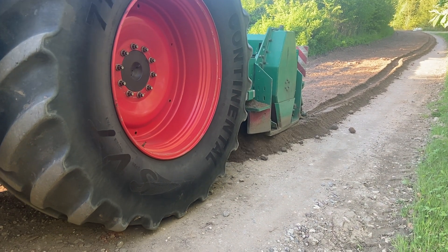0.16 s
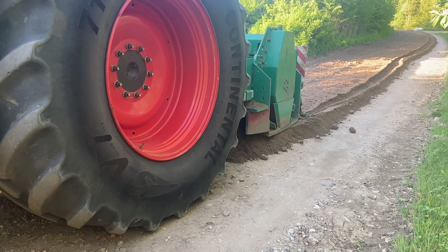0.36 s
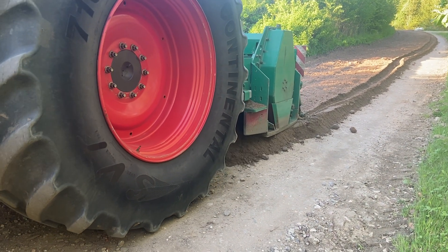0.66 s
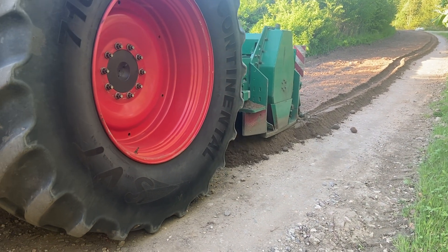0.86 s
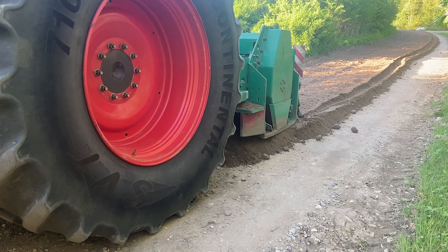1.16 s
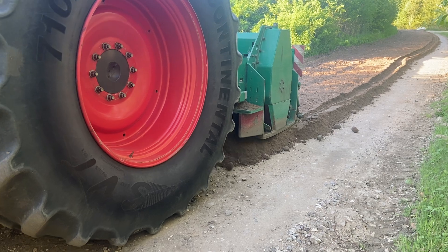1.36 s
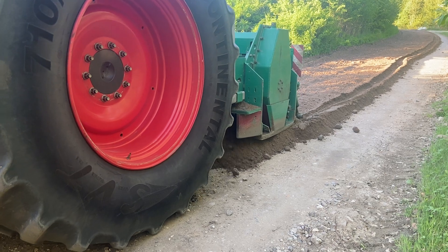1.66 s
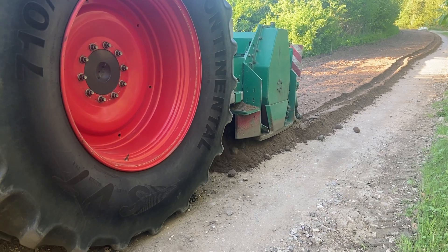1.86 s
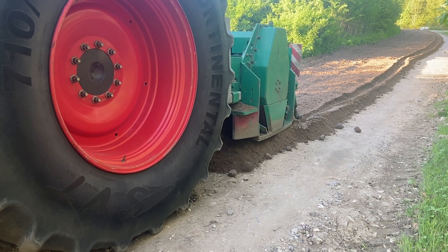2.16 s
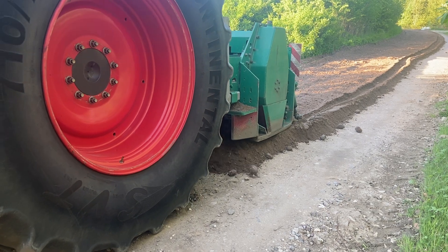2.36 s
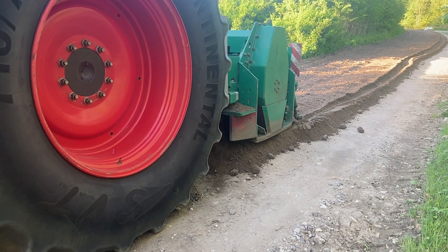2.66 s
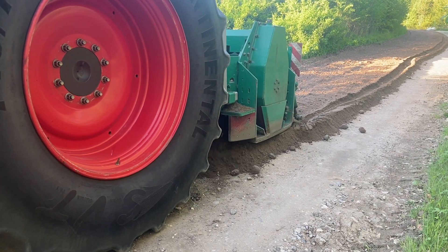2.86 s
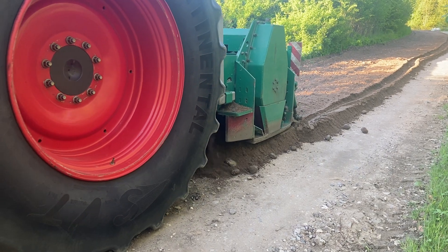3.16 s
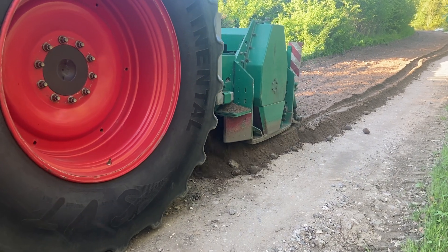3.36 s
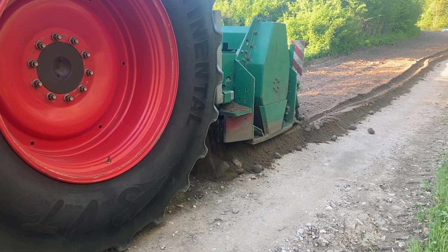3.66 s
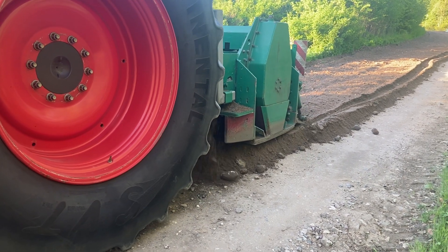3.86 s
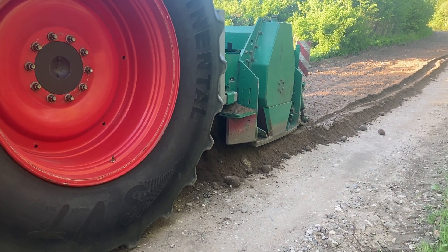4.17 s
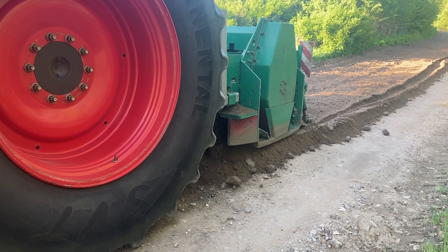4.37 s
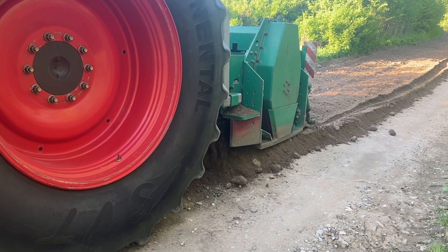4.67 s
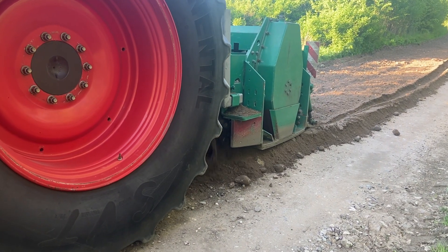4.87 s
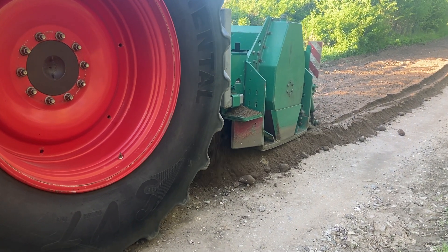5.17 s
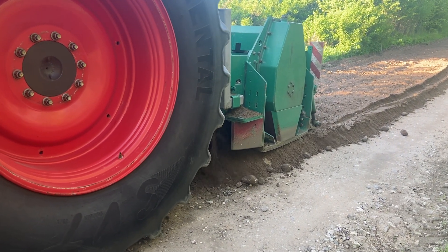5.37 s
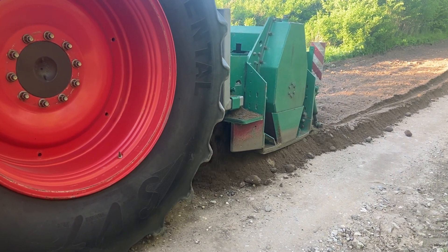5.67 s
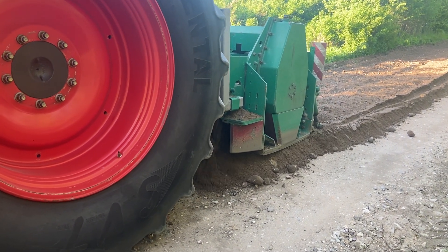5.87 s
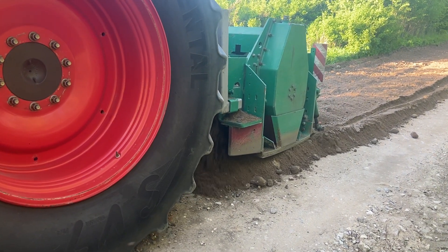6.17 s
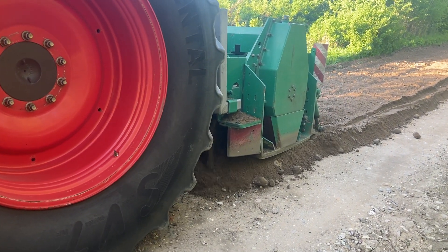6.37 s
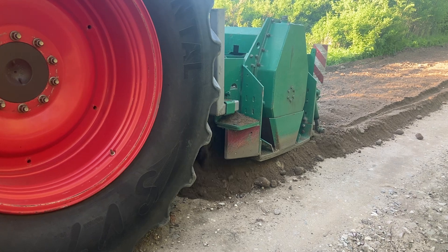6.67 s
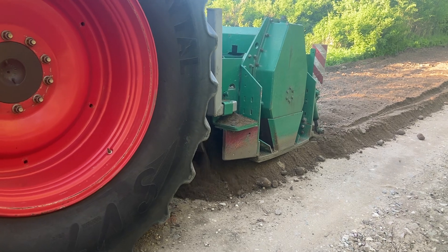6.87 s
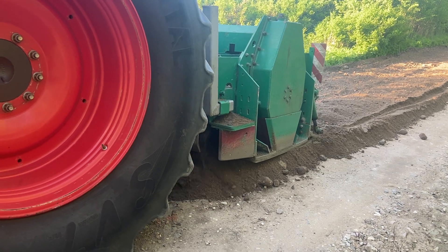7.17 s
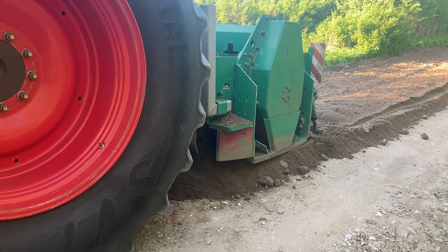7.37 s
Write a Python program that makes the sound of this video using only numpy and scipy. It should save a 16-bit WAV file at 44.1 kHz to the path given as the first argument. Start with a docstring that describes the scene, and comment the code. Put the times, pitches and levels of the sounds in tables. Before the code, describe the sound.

A tractor's diesel engine drones under load while its stone crusher steadily grinds gravel, with occasional sharp knocks of stones on steel.

```python
"""A tractor crushing stones

A tractor creeps along a track, driving a rotor stone crusher through coarse gravel.
The diesel drones and clatters, gears sing and the turbocharger whistles. Thousands of tiny
hits make the steady grinding, and now and then a larger stone bangs about in the steel housing."""
import sys
import numpy as np
from scipy import signal
from scipy.fft import irfft
from scipy.io import wavfile
from scipy.ndimage import uniform_filter1d

SR = 44100
rng = np.random.default_rng(int(sys.argv[2]) if len(sys.argv) > 2 else 0)


def store_wav(level_fs):
    """Save 16-bit WAV to argv[1]."""
    pcm = np.round(np.clip(np.atleast_2d(level_fs), -1, 1) * 32767)
    wavfile.write(sys.argv[1], SR, pcm.T.astype(np.int16))


N = 331191
TIME = np.arange(N) / SR
CUTOFF_HZ = 15700


def from_db(db):
    """Turn decibels into a number to multiply a sound by."""
    return 10 ** (np.asarray(db) / 20)


def rms_one(x):
    """Scale a sound so that its average strength (rms) is 1."""
    return x / np.sqrt(np.mean(x ** 2) + 1e-20)


def evened(x, size=500):
    """Hold a short noise at a steady strength of 1 while keeping its grain."""
    return x / np.sqrt(uniform_filter1d(np.mean(x ** 2, axis=0), size) + 1e-12)


def in_time(rows):
    """Join a table's timed rows with straight lines: one curve for each column after the time."""
    seconds, *columns = np.transpose(rows)
    return [np.interp(TIME, seconds, column) for column in columns]


def at_hz(rows, hz):
    """Look up a table's value at any pitch, sliding between its rows."""
    pitches, values = np.transpose(rows)
    return np.interp(np.log(hz), np.log(pitches), values)


def passing(first_db, last_db):
    """The machine creeps by at an even pace, so a level moves evenly from first to last."""
    return first_db + (last_db - first_db) * TIME / TIME[-1]


def bell(centre_s, half_width_s):
    """A smooth hump in time, of height 1."""
    return np.exp(-((TIME - centre_s) / half_width_s) ** 2)


def burst(start_s, fade_s, rise_s):
    """The loudness of one hit: a quick rise, and a fall of 60 dB in fade_s."""
    out, first = np.zeros(N), int(start_s * SR)
    age = np.arange(min(N - first, int(2 * fade_s * SR))) / SR
    out[first:first + len(age)] = (1 - np.exp(-age / rise_s)) * from_db(-60 * age / fade_s)
    return out


def drift(hz, step=64, warm_up=3000):
    """A smooth random wander of typical size 1; more hz makes it quicker."""
    r = np.exp(-2 * np.pi * hz * step / SR)
    noise = rng.standard_normal(N // step + warm_up + 2)
    slow = signal.lfilter([1], [1, -2 * r, r * r], noise)[warm_up:]
    return np.interp(np.arange(N) / step, np.arange(len(slow)), rms_one(slow))


def swaying(hz):
    """A random wander that stays between -1.5 and 1.5."""
    return 1.5 * np.tanh(drift(hz))


def panned(pan_db):
    """Left and right gains; a pan is how many dB louder the left ear is."""
    return from_db(np.array([[.5], [-.5]]) * pan_db)


def stereo(pair, alike):
    """Mix two unrelated sounds into left and right: alike is 0 for unrelated ears, 1 for the same."""
    shared = np.sqrt((1 + alike) / 2) * pair[0]
    opposite = np.sqrt((1 - alike) / 2) * pair[1]
    return np.array([shared + opposite, shared - opposite])


def from_left(x, lag_s=.00043):
    """Sound from the tractor's side reaches the right ear later."""
    return np.array([x[0], np.interp(TIME - lag_s, TIME, x[1])])


def from_right(x, lag_s=.00027):
    """Sound from the crusher's side reaches the left ear later."""
    delayed = np.maximum(np.arange(N) - round(lag_s * SR), 0)
    return np.array([x[0, delayed], x[1]])


def resonate(x, hz, *widths_hz):
    """Make a sound ring at one pitch, once for each width; narrower rings longer."""
    for width in widths_hz:
        r = np.exp(-np.pi * width / SR)
        feedback = [1, -2 * r * np.cos(2 * np.pi * hz / SR), r * r]
        x = signal.lfilter(np.array([1, 0, -1]) * (1 - r * r) / 2, feedback, x + 1e-18)
    return x


def impacts(per_s, spread_db):
    """Two streams of tiny random hits of uneven size."""
    hit = rng.random((2, N)) < per_s / SR
    sizes = from_db(spread_db * np.minimum(rng.exponential(1, (2, N)), 4))
    return rms_one(hit * sizes * rng.choice([-1, 1], (2, N)))


def tone(cycles, flutter, flutter_hz, alike):
    """One machine note; uneven load shakes its strength and timing, differently at each ear."""
    strength, timing = [flutter * stereo([drift(flutter_hz), drift(flutter_hz)], alike) for _ in range(2)]
    angle = 2 * np.pi * (cycles + rng.random())
    return ((1 + strength) * np.cos(angle) + timing * np.sin(angle)) / np.sqrt(.5 + flutter ** 2)


# How similar the noise is at the two ears. Each row: pitch in Hz, likeness from 0 to 1.
EAR_LIKENESS = [(60, 0.91), (130, 1), (290, 0.86), (500, 1), (700, 0.67), (1300, 0.82), (2300, 1),
                (4000, 0.64), (6000, 0.074), (9000, 0.03), (15000, 0)]
# Which way the noise leans. Each row: pitch in Hz, pan in dB.
EAR_BALANCE = [(60, -0.5), (110, 0.5), (200, 1), (380, -0.5), (700, 6.5), (1290, -2.5), (2380, -3),
               (4400, 2), (8120, -1), (15000, 1)]
def hail(colour, per_s, spread_db, flicker_db, surge_db, alike=None):
    """Tiny hits blur into a noise of strength 1, whose pitch bands surge together and flicker alone."""
    streams = impacts(per_s, spread_db), impacts(per_s, spread_db)
    edges = np.append(20 * 2 ** (np.arange(30) / 3), CUTOFF_HZ * 1.1)   # three bands to an octave
    out = np.zeros((2, N))
    for k, (low, high) in enumerate(zip(edges, edges[1:])):
        hz = np.sqrt(low * high)
        if colour[0][0] < hz < colour[-1][0]:
            band_filter = signal.butter(2, [low, high], "band", fs=SR, output="sos")
            band = signal.sosfilt(band_filter, streams[k % 2])
            gain = from_db(at_hz(colour, hz) + flicker_db * swaying(7.6))
            likeness = at_hz(EAR_LIKENESS, hz) if alike is None else alike
            out += gain * stereo(band, likeness) * panned(at_hz(EAR_BALANCE, hz))
    return rms_one(out * from_db(surge_db))


# The ring of the skid the crusher slides on. Each row: time in seconds, level in dB.
SKID_LEVELS = [(0, -60), (1.2, -47), (2.3, -47), (2.6, -40), (3.3, -41.5), (3.9, -54), (4.25, -41),
               (4.5, -53), (5.6, -49), (7.51, -52)]
def skid(hz=3940, width_hz=190):
    """Grit dragged under the steel skid keeps it faintly ringing."""
    level_db, = in_time(SKID_LEVELS)
    scraping = stereo(impacts(per_s=350, spread_db=2), alike=.33)
    return from_db(level_db) * rms_one(resonate(scraping, hz, width_hz, 4 * width_hz))


# Engine speed, sagging where the ground is packed. Each row: time in seconds, turns per second.
ENGINE_SPEED = [(0, 26.84), (.35, 26.96), (.95, 26.95), (1.15, 26.83), (1.75, 26.85), (2.1, 26.96),
                (3.2, 26.92), (4.05, 26.98), (4.35, 26.72), (4.9, 26.7), (5.6, 26.85), (5.9, 27.02),
                (6.2, 27.0), (6.55, 26.9), (7.51, 26.88)]
def engine_turns():
    """Count the engine's turns so far; everything geared to it follows this count."""
    return np.cumsum(in_time(ENGINE_SPEED)[0]) / SR


# The strongest high whine, like a pump's. Each row: time in seconds, level in dB.
PUMP_LEVELS = [(0, -54), (.25, -48), (.9, -49), (1.03, -44), (1.2, -48), (2.2, -49), (2.45, -42),
               (2.62, -52), (3.09, -44), (3.5, -54), (4.15, -47), (4.5, -58), (5.4, -52), (5.56, -42),
               (5.64, -53), (5.8, -39), (6.0, -54), (6.15, -43), (6.5, -54), (7.51, -48)]
# Fast gears. Each row: vibrations per engine turn, level in dB, pan in dB.
FAST_GEARS = [(146, -55, 0), (261.3, -56, 0)]
def high_whines(turns, pump_per_turn=270.6):
    """Fast parts geared to the engine sing thin notes that fade in and out."""
    pump_db, = in_time(PUMP_LEVELS)
    out = from_db(pump_db) * tone(pump_per_turn * turns, flutter=.7, flutter_hz=20, alike=.1)
    for per_turn, level_db, pan_db in FAST_GEARS:
        gain = from_db(level_db + 2 * swaying(3)) * panned(pan_db)
        out += gain * tone(per_turn * turns, flutter=1.3, flutter_hz=20, alike=.1)
    return out


# The turbo's whistle. Each row: time in seconds, pitch in Hz, level in dB.
TURBO_WHISTLE = [(0, 8060, -50), (.22, 8090, -48), (.6, 8000, -48), (.81, 8000, -50), (1.13, 7970, -44),
                 (1.55, 8000, -56), (1.63, 8016, -43), (1.85, 8130, -47), (2.17, 7860, -50),
                 (2.48, 7960, -42), (2.58, 7950, -44), (2.67, 7970, -40), (2.82, 7840, -45),
                 (2.88, 7880, -40), (2.98, 7860, -43), (3.05, 7840, -40), (3.14, 7830, -54),
                 (3.29, 7845, -37), (3.45, 7810, -52), (3.52, 7766, -39), (3.64, 7750, -40),
                 (3.74, 7800, -52), (4.2, 7700, -50), (4.5, 7690, -48), (4.98, 7900, -54),
                 (5.11, 7885, -37), (5.17, 7940, -39), (5.23, 7915, -41), (5.37, 7920, -35),
                 (5.46, 7965, -41), (5.7, 7950, -47), (5.97, 8000, -55), (6.1, 7915, -39),
                 (6.34, 7860, -51), (6.41, 7840, -43), (6.53, 7870, -57), (7.51, 7820, -52)]
def turbocharger():
    """The fan that pushes air into the engine chirps as its pressure rises and falls."""
    hz, level_db = in_time(TURBO_WHISTLE)
    gain = from_db(level_db + 1.5 * swaying(18))
    cycles = np.cumsum(hz + 6 * drift(12)) / SR
    return gain * tone(cycles, flutter=.45, flutter_hz=12, alike=.2)


def firing(turns):
    """A wave that peaks each time the engine fires, three times a turn."""
    return np.cos(2 * np.pi * 3 * turns)


# The tone colour of the engine's rattle. Each row: pitch in Hz, relative level in dB.
BUZZ_COLOUR = [(300, -20), (420, -4), (650, 2.5), (1050, -0.5), (1400, -12), (1800, -13), (2400, -4),
               (3000, -18), (4500, -12)]
def engine_buzz(turns, size=4096):
    """Injectors, valves and gears repeat a rattle every two turns; it slowly changes as they move by."""
    cycle_hz = ENGINE_SPEED[0][1] / 2
    hz = np.maximum(np.arange(size // 2 + 1), 1) * cycle_hz
    shape = from_db(at_hz(BUZZ_COLOUR, hz)) * (hz > BUZZ_COLOUR[0][0]) * (hz < BUZZ_COLOUR[-1][0])
    loops = irfft(shape * np.exp(2j * np.pi * rng.random((4, len(hz)))))   # four random rattles
    played = np.array([np.interp(turns / 2 % 1 * size, np.arange(size), loop) for loop in loops])
    blend = .55 * drift(.42)
    rattle = stereo(np.cos(blend) * played[:2] + np.sin(blend) * played[2:], alike=.53)
    return from_db(passing(-29.5, -35.5)) * from_left(rms_one(rattle * from_db(firing(turns))))


# The tone colour of the diesel's knock. Each row: pitch in Hz, relative level in dB.
CLATTER_COLOUR = [(450, -52), (650, 8), (800, 1.5), (1050, -1.5), (1450, 4), (1900, 2.5), (2400, -12.5),
                  (3200, 1), (4500, -31), (6000, -42), (8000, -43)]
def diesel_clatter(turns):
    """Burning fuel and valves knock, swelling with each firing and fading as the tractor passes."""
    knock = hail(CLATTER_COLOUR, per_s=9000, spread_db=4.5, flicker_db=-.5, surge_db=.26 * firing(turns))
    return from_db(passing(-25.5, -36.5)) * from_left(knock)


# Quiet notes of the engine, then of its shafts, belts and pumps.
# Each row: vibrations per engine turn, first level in dB, last level in dB, pan in dB.
ENGINE_NOTES = [(4, -36, -36, 1), (4.5, -30, -37, 2), (7.5, -35, -43, 3), (8.5, -31.5, -43, 3),
                (11, -37, -40, 3), (12, -40, -42, 0), (13, -45, -41, 0), (15, -38, -36, 0),
                (26, -43, -50, 0), (27, -43, -50, 2), (29, -47, -42.5, 3), (30, -35.5, -39.5, 5),
                (31.5, -42, -37, 5), (34.5, -40, -39.5, 6), (40, -40, -38.5, 0), (45, -39.5, -50, 0),
                (50, -44, -52, -4), (52.5, -48, -45, -2)]
SHAFT_NOTES = [(9.75, -37, -45, 1), (10.31, -31.5, -39, 2), (15.62, -37, -30.5, 0), (15.85, -46, -35, 0),
               (19.32, -39, -31, 4), (24.25, -41.5, -50, 8), (27.47, -42.5, -50, 3), (30.7, -47, -42.5, 3),
               (35.9, -50, -40, -1), (38.58, -34, -42, 5), (56.7, -50, -49, -4), (57.9, -43.5, -48, -4),
               (59.1, -48, -45, -3), (96.5, -57, -53, -2), (106.25, -53, -52, 3)]
def quiet_hums(turns):
    """The engine and the parts it spins each hum at their own multiple of its speed."""
    out = np.zeros((2, N))
    for per_turn, first_db, last_db, pan_db in ENGINE_NOTES + SHAFT_NOTES:
        gain = from_db(passing(first_db, last_db)) * panned(pan_db)
        out += gain * tone(per_turn * turns, flutter=.26, flutter_hz=3.8, alike=.58)
    return from_left(out)


# Four loud notes (firing, rotor, drive hum and its octave), then two notes of meeting gear teeth.
# Each row: vibrations per engine turn, pan in dB, flutter as a share of the note, flutter speed in Hz.
DRONE_NOTES = [(3, -.6, .22, 6), (5.18, -.6, .15, 4), (10.5, -.7, .22, 7), (21, 0, .24, 5)]
GEAR_NOTES = [(42, -2, .35, 12), (63, -3, .2, 8)]
# How the first five of those notes swell or dip as the machine creeps by. Each row: first level in dB,
# last level in dB, swell in dB (a dip if negative), its middle in seconds, its half-width in seconds.
NOTE_SWELLS = [(-29.5, -26.5, 3, 5.75, 0.55), (-37, -29, 4, 5.9, 1.6), (-30.5, -24, -11, 4.25, 1.02),
               (-38.5, -22, -4.5, 6.5, 1.1), (-31.5, -56.5, 19.5, 5.14, 1.3)]
# The higher gear note. Each row: time in seconds, level in dB, a number that is not played.
HIGH_GEAR_LEVELS = [(0, -33.5, -30), (.4, -34, -31), (.85, -32, -29), (1.1, -33, -29.5), (1.3, -35, -32),
                    (1.55, -38.5, -38), (2.0, -38, -34), (2.5, -34, -33.5), (2.8, -46, -36),
                    (2.93, -43, -31), (3.15, -39, -31), (3.4, -36, -37), (4.0, -34.5, -39),
                    (4.3, -32.5, -30), (4.85, -27.5, -33), (5.35, -30, -31.5), (5.95, -34.5, -37),
                    (6.399, -33, -31.5), (6.75, -31, -36), (7.51, -29.5, -37)]
def drone(turns, throb_db=3.8):
    """Engine, rotor and gears drone together; the higher gear note throbs with the load on the teeth."""
    levels = [passing(first_db, last_db) + swell_db * bell(centre_s, half_s)
              for first_db, last_db, swell_db, centre_s, half_s in NOTE_SWELLS]
    levels.append(in_time(HIGH_GEAR_LEVELS)[0] + throb_db * swaying(13))
    out = np.zeros((2, N))
    for (per_turn, pan_db, flutter, flutter_hz), level_db in zip(DRONE_NOTES + GEAR_NOTES, levels):
        out += from_db(level_db) * panned(pan_db) * tone(per_turn * turns, flutter, flutter_hz, alike=.85)
    return out


# Tone colours of the ground and the crusher's hood. Each row: pitch in Hz, relative level in dB.
RUMBLE_COLOUR = [(20, -26), (30, -17), (42, -7), (54, 9.5), (75, -4), (100, 15), (140, -38)]
BOOM_COLOUR = [(65, -28), (90, 0), (115, 0.5), (145, -1), (180, 2.5), (230, -2), (285, 0), (360, -15.5),
               (500, -49)]
# Jolts of the hood. Each row: start in seconds, rumble in dB, boom in dB, fade time in seconds.
HOOD_HEAVES = [(0.019, -24, -33, .55), (1.69, -44, -17, .67), (4.14, -23, -17, .3), (4.24, -20, -16.5, .35),
               (4.33, -25, -18, .4), (4.43, -25, -23, .3), (4.54, -24, -21, .45), (5.57, -20.5, -17.5, .36)]
def rumble_and_boom(lumps_db):
    """The ground rumbles and the hood booms, both louder when the hood heaves over a hard lump."""
    packed_soil_db = 5.5 * bell(centre_s=3.9, half_width_s=2.7)
    rumble_gain, boom_gain = from_db(-34 + packed_soil_db), from_db(-26)
    for start_s, rumble_db, boom_db, fade_s in HOOD_HEAVES:
        heave = burst(start_s, fade_s, rise_s=.0034)
        rumble_gain = np.hypot(rumble_gain, from_db(rumble_db) * heave)   # noises add by their power
        boom_gain = np.hypot(boom_gain, from_db(boom_db) * heave)
    rumble = hail(RUMBLE_COLOUR, per_s=3500, spread_db=-.5, flicker_db=1.5, surge_db=lumps_db)
    boom = hail(BOOM_COLOUR, per_s=6000, spread_db=1, flicker_db=.5, surge_db=lumps_db / 2)
    return rumble_gain * rumble + boom_gain * boom


# Tone colours of grit and sand. Each row: pitch in Hz, relative level in dB.
GRIT_COLOUR = [(2500, -51), (4000, -2), (4600, 4), (5750, 3), (7250, -7), (8100, -20)]
SAND_COLOUR = [(5000, -9), (5750, -3), (7250, 0.5), (9100, 0.5), (11500, -3.5), (14500, -7), (17000, -8)]
def grit_and_sand(flow_db, lumps_db):
    """Fine grit hisses and sand sprays against the skids, barely following the flow of gravel."""
    grit = hail(GRIT_COLOUR, per_s=22000, spread_db=5.5, flicker_db=.4,
                surge_db=lumps_db / 2 + .35 * drift(30))
    sand = hail(SAND_COLOUR, per_s=20000, spread_db=3.5, flicker_db=1.5,
                surge_db=lumps_db / 2 + .34 * drift(30), alike=1)
    grit *= from_db(passing(-39, -40) + .17 * flow_db)
    sand *= from_db(passing(-36, -39) + .17 * flow_db)
    return grit + from_right(sand)


# Low notes of the hood. Each row: pitch in Hz, width in Hz, relative level in dB.
PANEL_NOTES = [(237, 49, -17.5), (432.3, 27, -10), (511.6, 49.5, -3)]
def hood_panels(flow_db, lumps_db):
    """Gravel pelts the big panels, whose ring is dulled by the soil against them."""
    hits = stereo(impacts(per_s=1200, spread_db=2.5), alike=.93)
    ringing = sum((-1) ** k * from_db(db) * rms_one(resonate(hits, hz, width, 3 * width))
                  for k, (hz, width, db) in enumerate(PANEL_NOTES))
    return from_db(passing(-25.5, -25) + .55 * flow_db + lumps_db) * ringing


# Bright notes of the housing. Each row: pitch in Hz, width in Hz, gain in dB.
HOUSING_NOTES = [(1010, 540, -10.5), (1412, 61, 3.5), (1670.4, 64, 8.5), (1709, 66, 5), (1770, 61, -0.5),
                 (2224, 174, 2.5), (2470, 83, -10.5), (2850, 54, -2), (3730, 150, -22), (3914, 79, -21.5),
                 (4560, 58, -44)]
def steel_housing(flow_db, lumps_db):
    """Gravel keeps the steel plates ringing; every second note swings the opposite way."""
    hits = stereo(impacts(per_s=1400, spread_db=-.5), alike=.082)
    hits *= from_db(passing(-18, -14) + flow_db + 2 * lumps_db)
    return sum((-1) ** k * from_db(db) * resonate(hits, hz, width)
               for k, (hz, width, db) in enumerate(HOUSING_NOTES))


# Tone colours of drumming steel and grinding stone. Each row: pitch in Hz, relative level in dB.
DRUM_COLOUR = [(250, -33), (360, -0.5), (450, 1.5), (570, -4.5), (720, -6.5), (900, -1.5), (1140, -3),
               (1700, -47)]
GRIND_COLOUR = [(700, 0), (1000, -3.5), (1200, 4.5), (1480, -6.5), (1700, 1.5), (1950, -6), (2300, -0.5),
                (2700, -13), (3200, -9), (4000, -8), (5500, -19), (8000, -53)]
def rotor(flow_db, lumps_db):
    """The rotor churns the gravel, so it drums on the steel and grinds."""
    drum = hail(DRUM_COLOUR, per_s=3500, spread_db=2.5, flicker_db=2.5, surge_db=lumps_db)
    grind = hail(GRIND_COLOUR, per_s=5000, spread_db=2, flicker_db=2.95, surge_db=2 * lumps_db)
    drum *= from_db(passing(-28, -23) + .55 * flow_db)
    grind *= from_db(passing(-29, -29.5) + flow_db)
    return drum + grind


# The flow of gravel. Each row: time in seconds, level in dB (only its rise and fall count).
GRAVEL_FLOW = [(0.0, -28.5), (0.42, -29.5), (1.86, -30), (2.11, -29), (2.78, -29), (3.05, -30.5),
               (3.57, -28.5), (4.06, -29.5), (5.0, -29), (6.02, -30.5), (6.23, -27.5), (7.15, -32),
               (7.51, -27)]
def crushing():
    """Gravel reaches the rotor in a slowly changing flow with quick, uneven lumps."""
    flow_db, = in_time(GRAVEL_FLOW)
    flow_db -= flow_db.mean()
    lumps_db = .5 * swaying(10)
    return (rumble_and_boom(lumps_db) + rotor(flow_db, lumps_db) + grit_and_sand(flow_db, lumps_db)
            + hood_panels(flow_db, lumps_db) + steel_housing(flow_db, lumps_db))


def splinter(hits, hz):
    """Breaking stone makes a broad noise around a pitch set by its size."""
    return evened(resonate(hits, hz, .55 * hz, 1.8 * hz))


# Chips flicked against the outside. Each row: start in seconds, level in dB, pitch in Hz.
FLYING_CHIPS = [(1.309, -42, 10000), (2.123, -35, 4740), (2.489, -38, 10500), (3.768, -41, 8000),
                (4.207, -30, 3970), (4.703, -35, 4640), (5.12, -30, 4130), (5.33, -34, 5870),
                (5.543, -31, 6370), (6.161, -34, 5840), (6.716, -36, 6500), (6.883, -32.5, 5380),
                (7.246, -41, 11000)]
def chips(tick_db=3):
    """Flying chips land with a dry tick and a hint of a pitch of their own."""
    hits = stereo(impacts(per_s=6000, spread_db=2), alike=.5)
    out = np.zeros((2, N))
    for start_s, level_db, hz in FLYING_CHIPS:
        span = slice(int(start_s * SR), int((start_s + .2) * SR))
        ping = evened(resonate(hits[:, span], hz, .12 * hz, .5 * hz))
        ping *= burst(start_s, fade_s=.045, rise_s=.0005)[span]
        tick = splinter(hits[:, span], hz) * burst(start_s, fade_s=.03, rise_s=.0003)[span]
        out[:, span] += from_db(level_db) * (ping + from_db(tick_db) * tick)
    return out


# A steel plate hit squarely. Each row: pitch in Hz, relative level in dB.
PLATE_NOTES = [(1364, -4), (1680, 1.5), (1745, 2)]
# Stones caught by the rotor. Each row: start in seconds, thud in dB, its pitch in Hz, clang in dB,
# its pitch in Hz, plate ring in dB, crack in dB, its pitch in Hz, first strike compared with
# the bounces in dB, fade time of the bounces in seconds.
BIG_STONES = [(0.271, -21, 600, -39, 1500, -50, -31, 3480, -8, .2),
              (.329, -13.5, 520, -19, 1350, -50, -45, 3500, 0, .15),
              (0.519, -19, 553, -18.5, 1300, -50, -36, 3500, -2, 0.18),
              (.688, -28, 680, -22.5, 2200, -50, -25, 3800, -2, .2),
              (.694, -10, 685, -17, 1100, -50, -31, 3300, -9, .18),
              (.738, -13, 510, -32, 1200, -50, -42, 3500, -9, .15),
              (1.888, -34, 587, -24, 1530, -43, -27.5, 3470, 1, .27),
              (2.484, -16, 1060, -11, 1560, -19, -25, 3700, -0.5, 0.24),
              (3.047, -35, 550, -47, 1525, -50, -23.5, 3500, -12, 0.2),
              (3.081, -8.5, 497, -40, 1525, -50, -40, 3500, -12, .14),
              (3.35, -14.5, 687, -22, 1400, -50, -36, 3500, -2, 0.18),
              (3.664, -15, 600, -12.5, 1600, -21, -33, 3700, -7, 0.18),
              (3.725, -12, 520, -28, 1400, -50, -43, 3500, -6, .3),
              (4.09, -11.5, 476, -28, 1525, -50, -40, 3500, -9, .2),
              (4.114, -20, 503, -19.5, 1600, -45, -21, 3200, -6, .19),
              (4.78, -31, 560, -38, 1525, -50, -33, 3400, -12, .22),
              (4.802, -16, 800, -17, 1450, -20, -28, 4000, -1, .19),
              (4.84, -16, 515, -32, 1525, -35, -41, 3500, -9, .26),
              (6.138, -13, 500, -39, 1525, -50, -35, 3500, -9, .2),
              (6.235, -12.5, 750, -22, 1400, -50, -35, 3800, -9, .18),
              (6.274, -23, 608, -25, 1700, -45, -21.5, 2970, -3, .16),
              (6.581, -15, 503, -21, 1400, -40, -22.5, 2900, -2, .18),
              (6.638, -12.5, 560, -36, 1525, -50, -36, 4200, -6, .59),
              (6.789, -31, 600, -18.5, 1380, -25, -37, 3500, -1, 0.16),
              (7.468, -13.5, 814, -15, 1520, -36, -37, 3100, -3, 0.13)]
def stones():
    """A stone thuds on the hood and cracks; splinters bounce off the steel, and a plate may ring."""
    hits = stereo(impacts(per_s=5000, spread_db=2.5), alike=.6)
    push = stereo(impacts(per_s=5000, spread_db=1), alike=.9)
    plate = sum(from_db(db) * np.sin(2 * np.pi * (hz * TIME + rng.random())) for hz, db in PLATE_NOTES)
    out = np.zeros((2, N))
    for (start_s, thud_db, thud_hz, clang_db, clang_hz, ring_db,
         crack_db, crack_hz, strike_db, fade_s) in BIG_STONES:
        span = slice(int(start_s * SR), int((start_s + .5) * SR))
        thud = from_db(thud_db) * evened(resonate(push[:, span], thud_hz, 70, 300))
        thud *= burst(start_s, fade_s=.17, rise_s=.0094)[span]
        clang = from_db(clang_db) * splinter(hits[:, span], clang_hz)
        crack = from_db(crack_db) * splinter(hits[:, span], crack_hz)
        strike = from_db(strike_db) * burst(start_s, fade_s=.05, rise_s=.0015)[span]
        bounces = burst(start_s, fade_s, rise_s=.014)[span]
        ring = from_db(ring_db) * plate[span] * burst(start_s, fade_s=.15, rise_s=.0017)[span]
        out[:, span] += thud + (clang + crack) * (strike + bounces) + ring
    return out


def scene():
    """Everything heard from beside the rear wheel."""
    turns = engine_turns()
    tractor = drone(turns) + quiet_hums(turns) + diesel_clatter(turns) + engine_buzz(turns)
    whistles = turbocharger() + high_whines(turns)
    return tractor + whistles + crushing() + skid() + stones() + chips()


def record(dry):
    """Cut away the deepest rumble and the highest hiss."""
    low_cut = signal.butter(2, 24, "high", fs=SR, output="sos")
    high_cut = signal.ellip(14, .1, 90, CUTOFF_HZ, fs=SR, output="sos")
    return signal.sosfilt(high_cut, signal.sosfilt(low_cut, dry))


dry = scene()
out = record(dry)
store_wav(out)
```